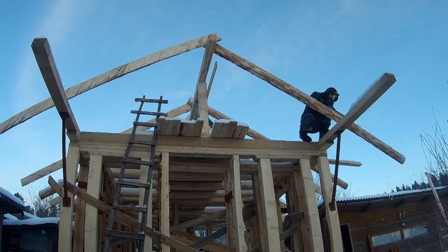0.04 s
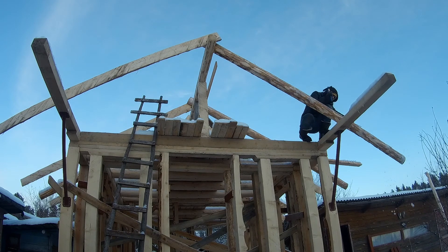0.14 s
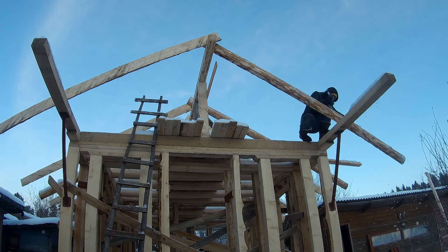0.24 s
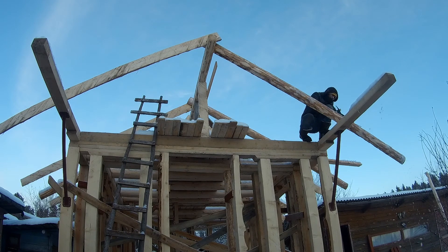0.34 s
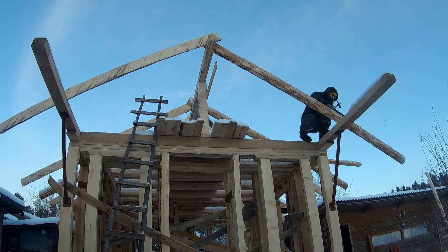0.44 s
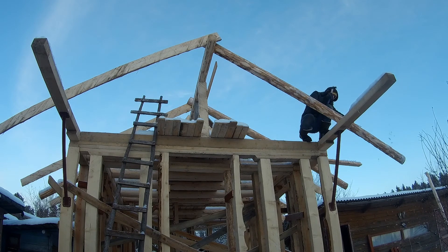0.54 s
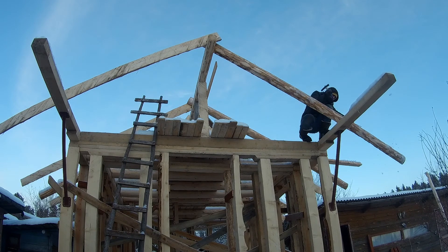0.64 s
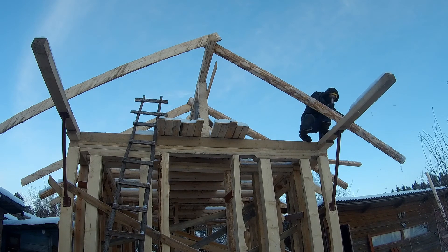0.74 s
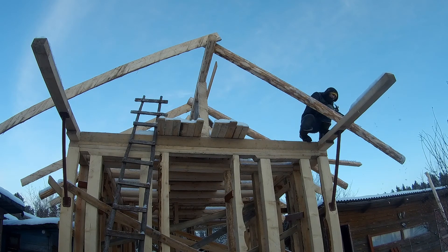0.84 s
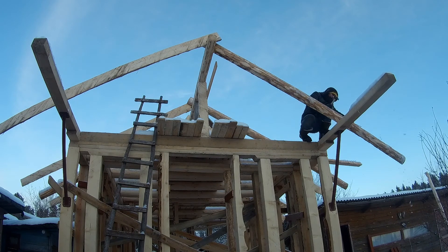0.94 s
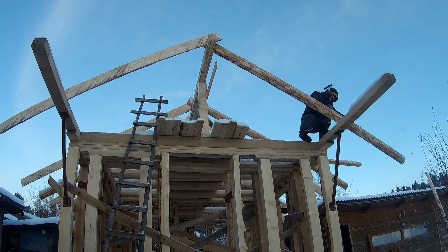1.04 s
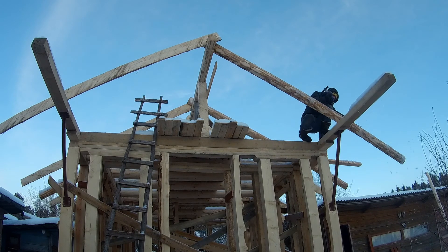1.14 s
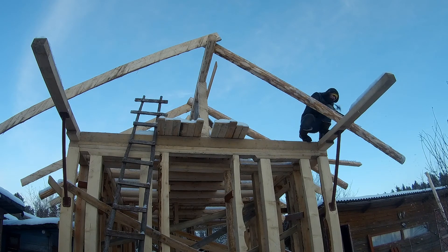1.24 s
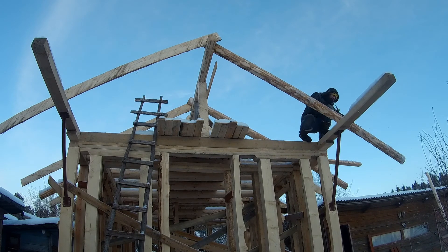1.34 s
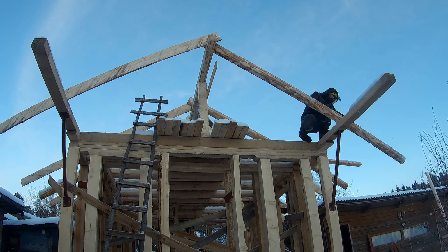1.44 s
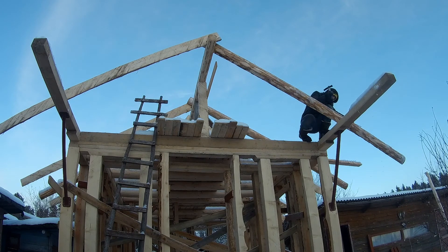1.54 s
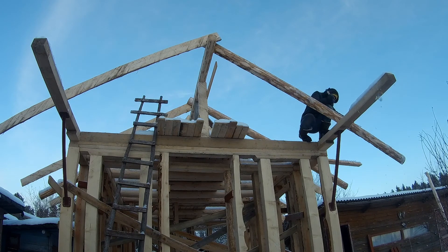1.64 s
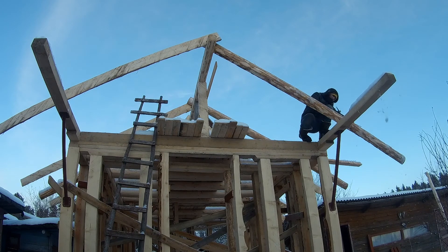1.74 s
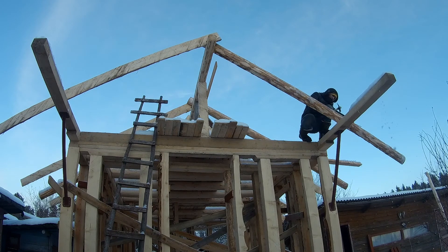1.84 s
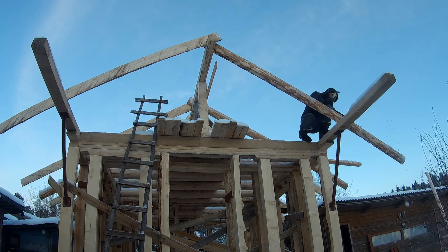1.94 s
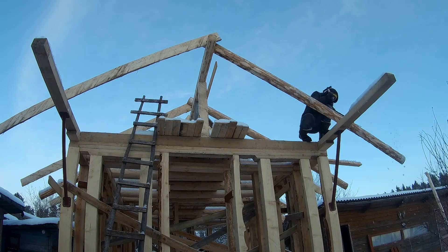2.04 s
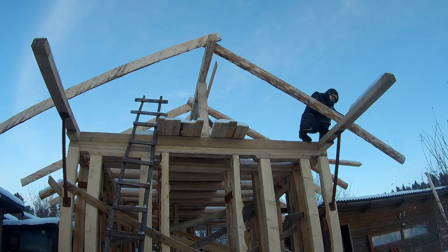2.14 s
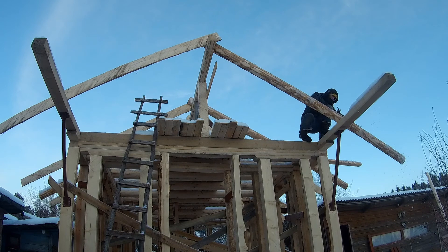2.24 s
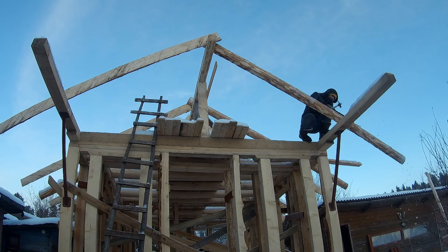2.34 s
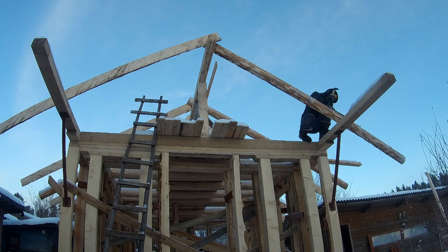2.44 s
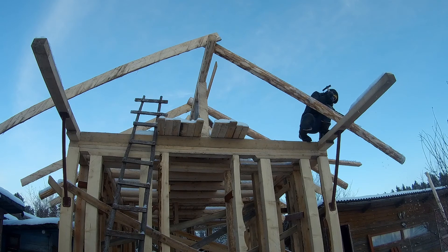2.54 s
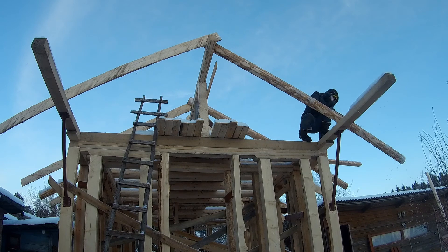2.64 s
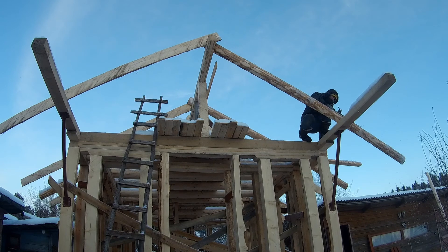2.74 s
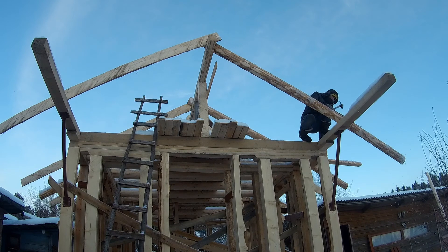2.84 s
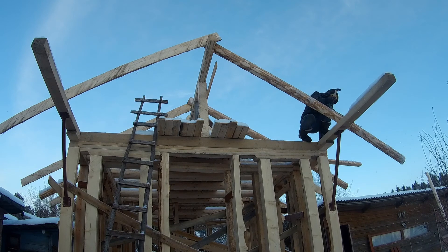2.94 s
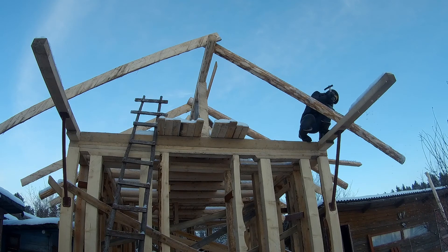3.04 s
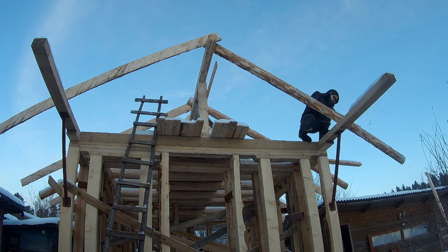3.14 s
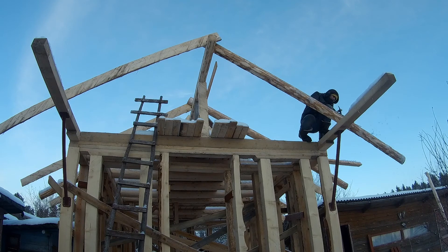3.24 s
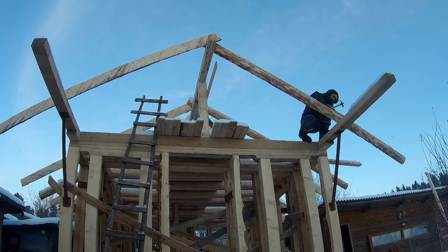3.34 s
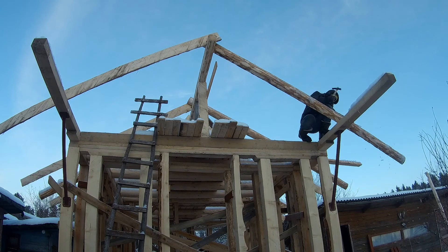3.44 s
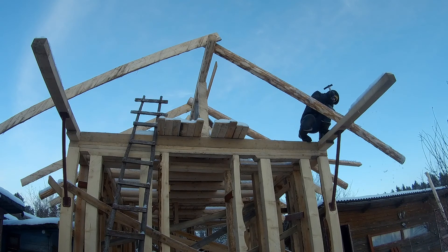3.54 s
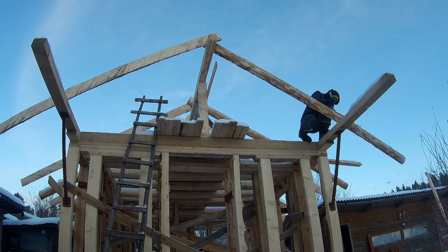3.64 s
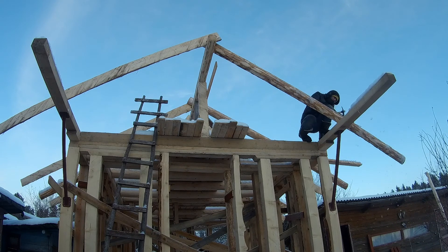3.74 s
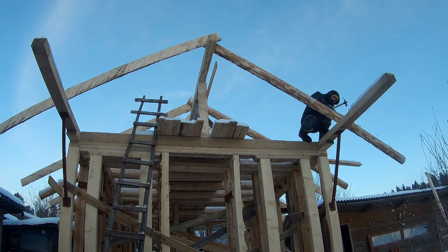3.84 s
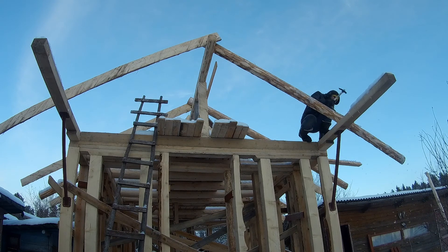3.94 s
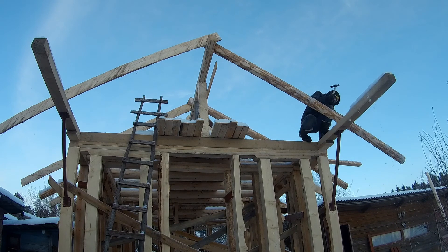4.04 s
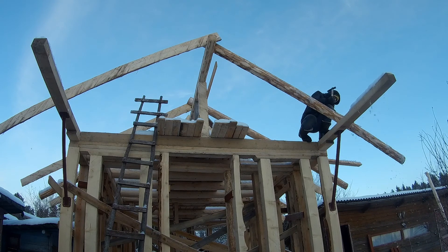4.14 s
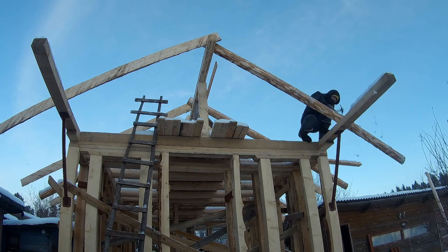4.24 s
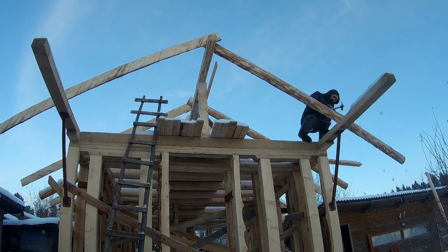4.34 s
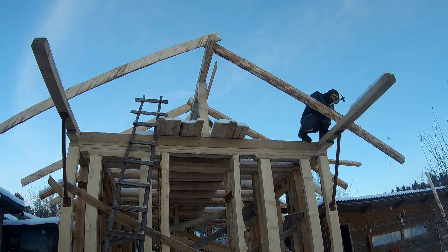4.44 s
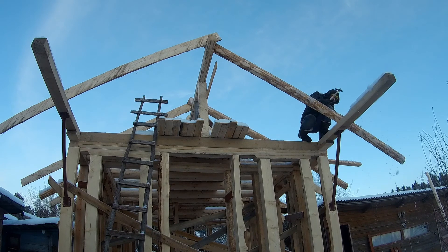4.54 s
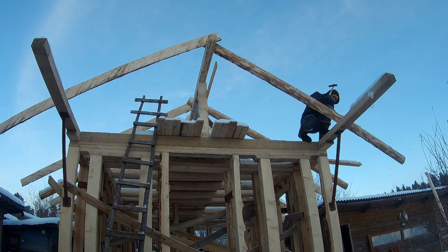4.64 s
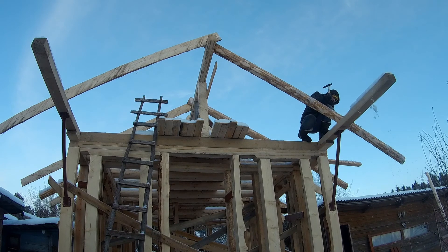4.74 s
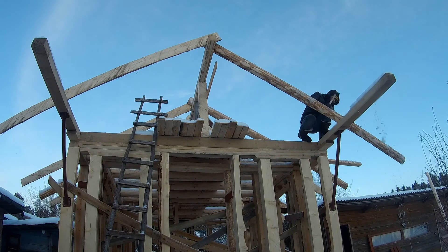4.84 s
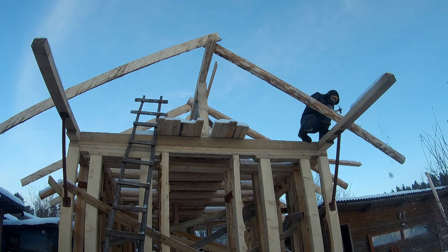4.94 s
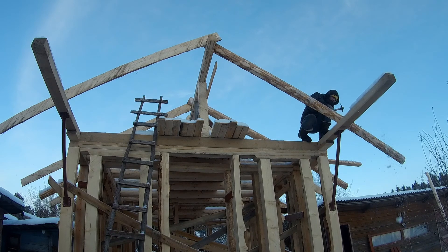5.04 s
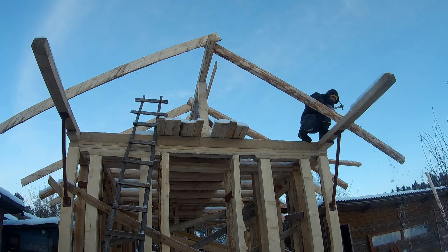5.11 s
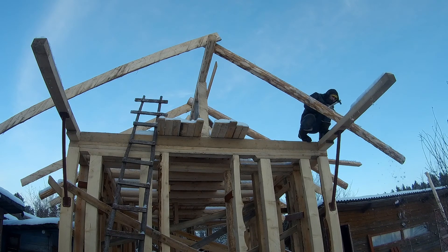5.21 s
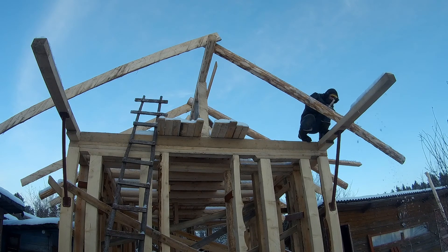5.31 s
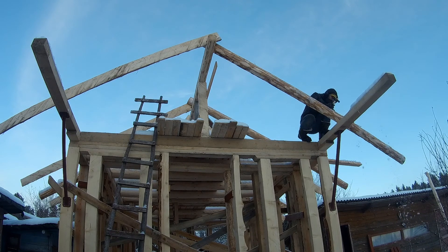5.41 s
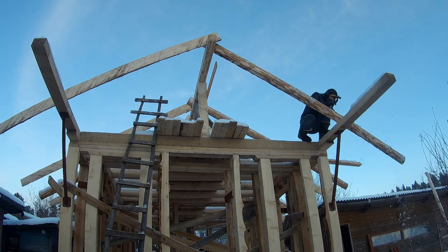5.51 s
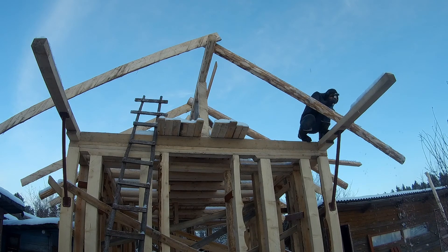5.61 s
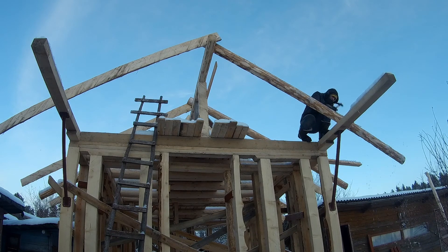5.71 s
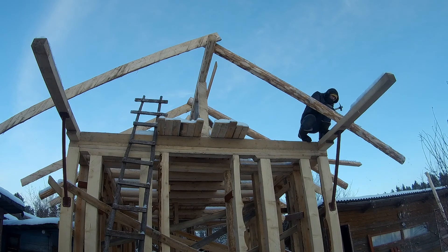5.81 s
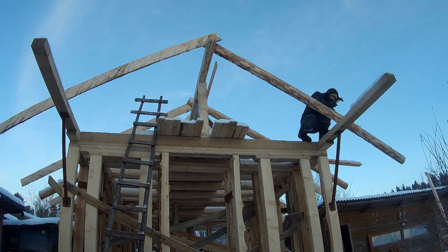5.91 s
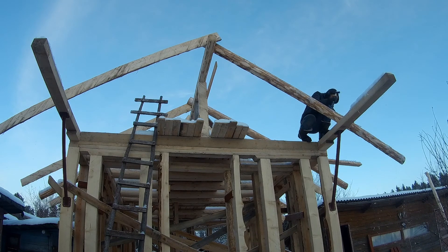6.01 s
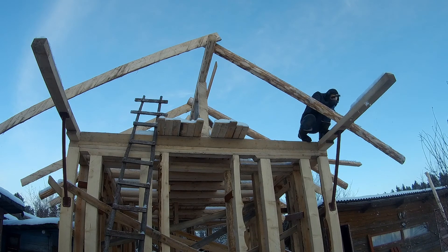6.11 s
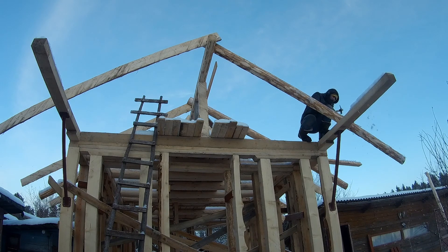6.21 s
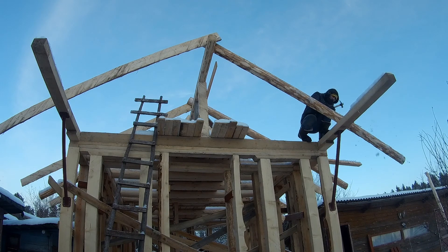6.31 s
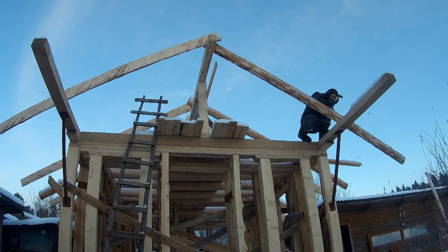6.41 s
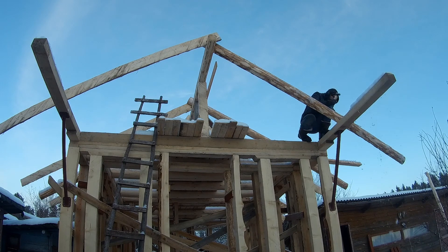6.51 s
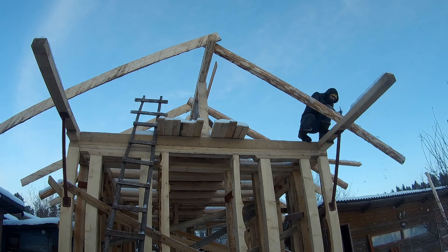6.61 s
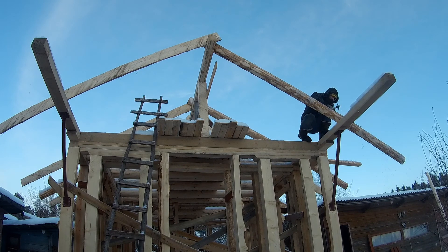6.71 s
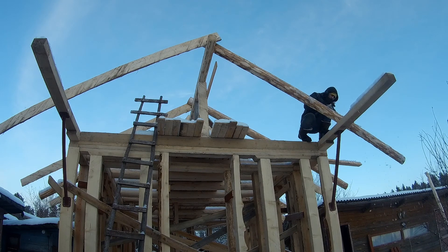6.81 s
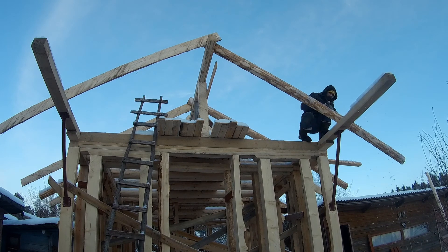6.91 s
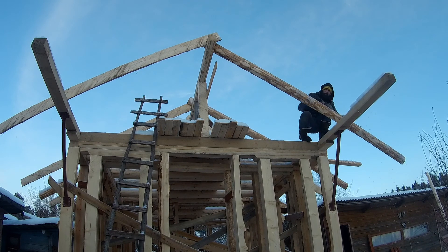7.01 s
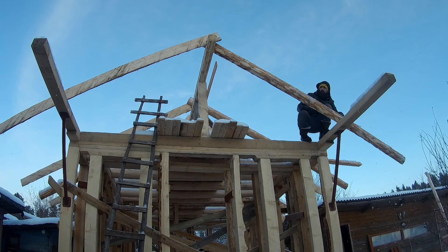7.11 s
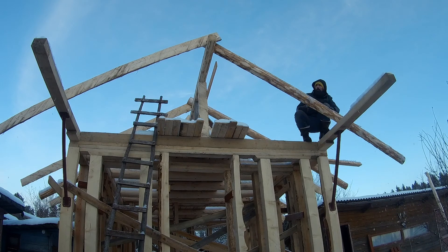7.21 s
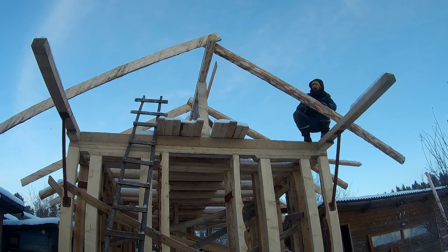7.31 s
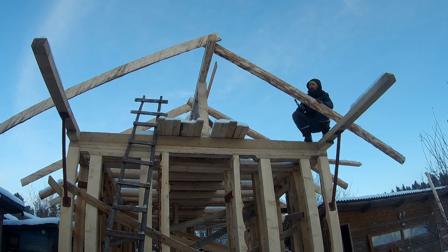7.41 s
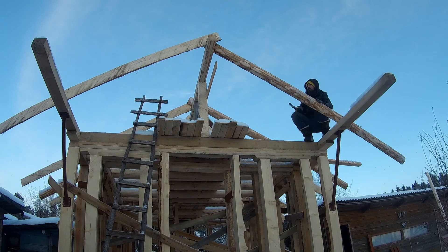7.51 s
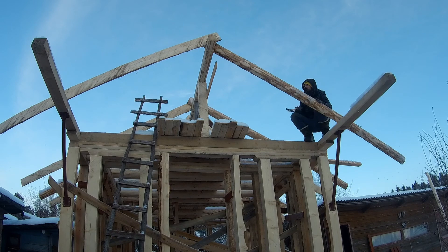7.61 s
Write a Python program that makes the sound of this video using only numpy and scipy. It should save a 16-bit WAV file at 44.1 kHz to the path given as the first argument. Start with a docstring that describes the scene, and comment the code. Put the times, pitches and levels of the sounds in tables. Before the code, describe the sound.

Evenly paced hammer blows on a nail ring through a timber frame outdoors, deepening as it sinks, then cloth rustles faintly.

```python
"""A hammer drives a long nail into a rafter of an open timber frame, heard from the ground on a still winter day.
Over a faint bed of air (shaped noise), the ring of a blow struck before the start is heard first.
Each blow is a steel crack (click), a wooden knock (click), a rafter ring (decaying sines) and a low shudder (noise);
beams, ground and nearby walls send the same echoes back every time. Faint ticks (noise bursts) fall in between.
At the end cloth rustles faintly: grainy noise whose colour shifts."""
import sys
import numpy as np
from scipy import signal
from scipy.fft import rfft, irfft
from scipy.io import wavfile
from scipy.ndimage import uniform_filter1d

SR = 44100
rng = np.random.default_rng(int(sys.argv[2]) if len(sys.argv) > 2 else 0)


def log_audio(samples):
    """Write samples as a 16-bit WAV file to the path given in sys.argv[1]."""
    # one column per channel
    frames = np.atleast_2d(samples).T
    # limit to full scale, then quantise
    limited = np.clip(frames, -1, 1)
    pcm = np.round(limited * 32767).astype(np.int16)
    wavfile.write(sys.argv[1], SR, pcm)


N = 337806
LEAD = SR // 2  # samples made before the start, so that an earlier blow can ring on


def gain_of(db):
    """Decibels to a factor."""
    return 10 ** (np.asarray(db) / 20)


def evened(x):
    """Scales to rms 1."""
    return x / np.sqrt(np.mean(x ** 2) + 1e-20)


def read(points, hz, index=1):
    """Reads one column of a table over log frequency."""
    table = np.transpose(points)
    return np.interp(np.log(hz + 1), np.log(table[0] + 1), table[index])


def coloured(x, points):
    """Passes x through a spectrum."""
    hz = np.fft.rfftfreq(len(x), 1 / SR)
    return irfft(rfft(x) * gain_of(read(points, hz)), len(x))


def add(mix, s, sound):
    """Mixes a sound in at s seconds."""
    part = mix[LEAD + round(s * SR):][:len(sound)]
    part += sound[:len(part)]


def minimum_phase_click(points, size):
    """The click that a sharp impulse makes through a spectrum, nothing before its start."""
    hz = abs(np.fft.fftfreq(size, 1 / SR))
    log_gain = np.log(gain_of(read(points, hz)))
    click = np.fft.ifft(np.exp(np.conj(signal.hilbert(log_gain)))).real
    return click / np.linalg.norm(click) * np.sqrt(SR / 1000)  # its energy is that of 1 ms at level 1


def snap(points, wake_db, t60, size):
    """Two rows: a bare click, and the same click with a short rough wake."""
    t = np.arange(size) / SR
    click = minimum_phase_click(points, size)
    roughness = gain_of(wake_db - 60 * t / t60) * rng.standard_normal(size)
    wake = signal.oaconvolve(roughness, click)[:size]
    return np.array([click, click + wake])


# Noise colour of the still air. Each row: frequency in Hz, relative density in dB per Hz.
AIR_COLOUR = [(12, -30.5), (20, -5), (86, 3), (285, -14), (780, -8), (897, -8), (2670, -20.5), (7110, -28),
              (8650, -26), (13200, -34.5), (16000, -38)]
AIR_DB = -71.5  # rms level


def still_air():
    """Outdoor air: steady noise, strongest in the lows."""
    return gain_of(AIR_DB) * evened(coloured(rng.standard_normal(N), AIR_COLOUR))


# Modes of the rafter. Each row: frequency in Hz, relative level in dB with the nail proud,
# relative level in dB with the nail sunk, decay to -60 dB in seconds.
RAFTER_MODES = [(114, -24.5, -27, 0.9), (177.3, -4.5, -14, 0.27), (232.3, -13, -15, 0.25),
                (253.5, -14.5, -14, 0.18), (335, -11, -17, 0.13), (386.6, -0.5, -9, 0.2),
                (395, -13.5, -6.5, 0.095), (487.4, -9, -2.5, 0.15), (577, -15.5, -2, 0.27),
                (605, -18, -3, 0.096), (687, -14, -5, 0.077), (749.6, -11, -6, 0.22), (791, -11, -2, 0.11),
                (824, -14.5, -3, 0.13), (904, -10, -8, 0.19), (970, -10, -15.5, 0.2),
                (1106, -12.5, -8.5, 0.062), (1203, -7.5, 6.5, 0.066), (1321, -1.5, -9.5, .11),
                (1420, -17.5, -12.5, 0.042), (1474, -15, -13, 0.11), (1565, -19, -5.5, 0.21),
                (1708, -8, -12, 0.16), (1853, -10.5, -21, 0.13), (1971, -3.5, -16, 0.089),
                (2346, -17, -16, 0.077), (2690, -10, -21.5, 0.022)]


def rafter(sunk, build_s):
    """The rafter's modes; the deeper the nail, the more the head meets the wood and the higher modes speak."""
    t = np.arange(SR // 3) / SR
    sunk = np.clip(sunk, 0, 1)
    ring = np.zeros(len(t))
    for hz, proud_db, sunk_db, t60 in RAFTER_MODES:
        mode_db = proud_db + sunk * (sunk_db - proud_db) + 0.5 * rng.standard_normal()
        ring += gain_of(mode_db - 60 * t / t60) * np.sin(2 * np.pi * (hz * t + rng.random()))
    drain = 0.5 + gain_of(-60 * t / 0.1)  # the joints quickly carry much of the motion off into the frame
    build_up = 1 - np.exp(-(t / build_s) ** 2)  # sound arrives from ever farther along the beam
    return ring * drain * build_up


# Dense wood modes, heard as one spectrum. Each row: frequency in Hz, relative level in dB.
KNOCK_COLOUR = [(90, -28), (180, -14), (500, -2), (1200, 0.5), (2000, -7.5), (3000, -17), (4200, -31.5),
                (7000, -47.5)]


def wooden_knock():
    """The wood's many close modes, struck together: a click with a rough wake."""
    return snap(KNOCK_COLOUR, -21.5, 0.032, size=4096)


# Spectrum of steel on steel. Each row: frequency in Hz, relative level in dB.
CRACK_COLOUR = [(800, -23.5), (1500, -4), (2600, -3.5), (3400, -9.5), (4300, -5), (6000, -15.5),
                (8000, -13), (9600, -21.5), (11000, -15), (13000, -27.5), (16000, -35)]


def steel_crack(dull_hz):
    """The crack of head on nail, low-passed at a lower edge in softer contacts."""
    dulling = signal.butter(2, np.clip(dull_hz, 500, 20000), fs=SR)
    return signal.lfilter(*dulling, snap(CRACK_COLOUR, -14.5, 0.014, size=2048))


# Spectrum of the whole frame moving. Each row: frequency in Hz, relative level in dB.
SHUDDER_COLOUR = [(20, -16), (30, -7), (55, 2), (80, 3.5), (110, -4), (150, -13), (250, -46.5)]


def frame_shudder(rise_s, t60, size):
    """The frame shaken as a whole: low noise that swells over rise_s and dies away."""
    t = np.arange(size) / SR
    rumble = evened(coloured(rng.standard_normal(size), SHUDDER_COLOUR))
    return rumble * (1 - np.exp(-t / rise_s)) * gain_of(-60 * t / t60)


# Single echoes off beams, ground and walls.
# Each row: delay in seconds, level of the crack's echo in dB, level of the knock's echo in dB.
ECHOES = [(.0033, 2.5, 2), (.0085, -5.5, 5), (0.0134, -15, -4), (.021, -23, -9.5), (.038, -19.5, -23),
          (0.06, -21, -48.5), (.142, -35.5, -33), (.153, -40, -26.5), (0.197, -44, -49), (.212, -58, -33),
          (.272, -66, -71)]


def echo_taps(column):
    """Direct sound and single echoes; rough faces smear the far ones."""
    taps = np.zeros(SR // 2)
    taps[0] = 1
    for echo in ECHOES:
        smear = min(max(echo[0] - 0.015, 0) * 6000, 260)  # samples, growing past 15 ms of delay
        face = np.hanning(3 + round(smear))[1:-1]
        face = face * rng.choice([-1.0, 1.0], len(face))
        taps[round(echo[0] * SR):][:len(face)] += gain_of(echo[column]) * face / np.linalg.norm(face)
    return taps


# Scattered sound. Each row: frequency in Hz, level among the beams in dB, its decay to -60 dB in seconds,
# level in the yard in dB, its decay to -60 dB in seconds, level from far trees in dB.
SCATTER = [(100, -5, 0.47, -24.5, 0.72, -45), (298, 0, 0.27, -18.5, 0.37, -51),
           (915, -0.5, 0.087, -14, 0.4, -35.5), (2020, -2, 0.12, -14.5, 0.41, -39),
           (3200, 2, 0.081, -22.5, 0.42, -53), (4700, -1.5, 0.053, -22, 0.28, -58),
           (10000, 0, 0.091, -27, 0.58, -66.5), (15000, -6.5, 0.046, -34, .2, -71)]
FAR_DELAY_S, FAR_SPREAD_S, FAR_DB = 0.585, 0.03, -52  # a late, soft answer from far off


def scattered():
    """Sound scattered among the beams, in the yard and from far trees: noise decaying band by band."""
    hz, t, z = signal.stft(rng.standard_normal(SR), SR, nperseg=128)
    near_db, near_t60, yard_db, yard_t60, far_db = (read(SCATTER, hz, index=k)[:, None] for k in range(1, 6))
    wall = 1 + 0.66 * (t > 0.138)  # a distant wall lifts the yard's answer as its echo arrives
    level = gain_of(near_db - 60 * t / near_t60)
    level += wall * gain_of(yard_db - 60 * t / yard_t60)
    level += gain_of(far_db - 60 * t / 1.6)
    late = np.exp(-((t - FAR_DELAY_S) / FAR_SPREAD_S) ** 2)
    late_colour = np.exp(-np.log((hz[:, None] + 1) / 1100) ** 2)
    level += gain_of(FAR_DB) * late * late_colour
    onset = 1 - np.exp(-np.arange(SR) / SR / 0.0031)
    return signal.istft(z * level, SR, nperseg=128)[1][:SR] * onset


# The hammer blows. Each row: time of the crack in seconds, gain of the rafter's modes in dB,
# level of the steel crack in dB over 1 ms, how far the nail is sunk from 0 to 1, build-up of the wood in seconds.
BLOWS = [(-.130, -20, -19.5, 0.52, 0.0014), (0.3366, -21.5, -18, 0, 0.0023),
         (0.7949, -19.5, -17.5, 0, 0.0032), (1.2644, -17, -17, .17, 0.0046),
         (1.7451, -18.5, -17.5, 0.16, .0023), (2.2197, -16, -17, 0.29, .004),
         (2.7200, -12, -17.5, 0.46, 0.0032), (3.2183, -10.5, -18.5, 0.76, 0.0035),
         (3.7385, -9.5, -17.5, 0.74, .0045), (4.2550, -9, -16, 0.79, .0067),
         (4.9310, -9.5, -25, 0.72, 0.0085), (5.7414, -10.5, -27.5, 0.85, 0.0027),
         (6.1811, -11.5, -16, 1, 0.0038), (6.6227, -9.5, -29, 0.78, 0.003)]
# a crack below full level is duller: dB of edge frequency per dB lost
FULL_CRACK_DB, CRISP_HZ, DULLING = -19.5, 11900, 0.87
# knock over ring, gain as the nail sinks, share of the crack's loss
KNOCK_DB, KNOCK_SUNK_DB, KNOCK_SHARE = -6.5, 9.0, 0.67
# the longer the wood takes to build up, the heavier the thud
SHUDDER_DB, THUD_DB, THUD_DB_PER_S = -47.5, -65, 3999


def hammering():
    """All blows; the rafter starts just before the crack, as sound runs faster along the beam than through air."""
    cracks, knocks, beam, low, spread = np.zeros((5, N + LEAD))
    for s, ring_db, crack_db, sunk, build_s in BLOWS:
        loss_db = min(crack_db - FULL_CRACK_DB, 0)
        knock_db = ring_db + KNOCK_DB + KNOCK_SUNK_DB * sunk ** 2 + KNOCK_SHARE * loss_db
        bare_knock, knock = gain_of(knock_db) * wooden_knock()
        bare_crack, crack = gain_of(crack_db) * steel_crack(CRISP_HZ * gain_of(DULLING * loss_db))
        add(beam, s - 0.002, gain_of(ring_db) * rafter(sunk, build_s))
        add(knocks, s - 0.0035 + 0.8 * build_s, knock)
        add(cracks, s, crack)
        # the bare clicks feed the scattered tail, keeping its colour even
        add(spread, s, gain_of(-19) * bare_knock)
        add(spread, s, gain_of(-22) * bare_crack)
        add(low, s, gain_of(SHUDDER_DB) * frame_shudder(0.01, 1.2, size=SR))
        thud_db = THUD_DB + THUD_DB_PER_S * build_s
        add(low, s, gain_of(thud_db) * frame_shudder(0.004, 0.18, size=SR // 4))
    # crack and knock get single echoes; the rafter's ring has its early echoes within its mode levels
    echoed = signal.fftconvolve(cracks, echo_taps(column=1))
    echoed += signal.fftconvolve(knocks, echo_taps(column=2))
    # a little of the rafter's ring joins the clicks in the scattered tail
    diffuse = signal.fftconvolve(spread + gain_of(-35) * beam, scattered())
    return (beam + low + echoed[:N + LEAD] + diffuse[:N + LEAD])[LEAD:]


# Faint ticks. Each row: start in seconds, level in dB before the band filter.
TICKS = [(4.6794, -60), (4.8996, -59), (5.2636, -54), (5.273, -56), (5.599, -65), (7.5074, -61.5)]


def ticks():
    """Faint dry ticks: band-passed noise that dies within milliseconds."""
    out = np.zeros(N + LEAD)
    t = np.arange(600) / SR
    band = signal.butter(1, (1900, 9100), "bandpass", fs=SR)  # Hz
    for s, db in TICKS:
        add(out, s, gain_of(db - 60 * t / 0.017) * signal.lfilter(*band, rng.standard_normal(600)))
    return out[LEAD:]


# Noise colour of rubbing cloth. Each row: frequency in Hz, relative density in dB per Hz.
CLOTH_COLOUR = [(88, -40), (150, -11.5), (515, -0.5), (972, -5), (1730, 0), (3470, -12.5), (5720, -12.5),
                (6810, -23.5), (7790, -16.5), (15000, -36)]
# faded in by the first time, peaks, fades out from the last; the fade-in takes twice the edge
RUSTLE_S, RUSTLE_TOP_S, RUSTLE_END_S, RUSTLE_EDGE_S = 7.08, 7.32, 7.6, 0.061
RUSTLE_DB, RUSTLE_SAG_DB, RUSTLE_PATCHY_DB = -58.5, -3, 2.5  # at the peak, lower towards both ends, uneven


def rustle():
    """Cloth: hiss with small uneven grains, its colour shifting as folds rub."""
    t = np.arange(N) / SR
    times = [RUSTLE_S, RUSTLE_TOP_S, RUSTLE_END_S]
    arch_db = RUSTLE_DB + np.interp(t, times, [RUSTLE_SAG_DB, 0, RUSTLE_SAG_DB])
    nearest_edge = np.minimum((t - RUSTLE_S) / 2, RUSTLE_END_S - t)
    edges = np.clip(nearest_edge / RUSTLE_EDGE_S + 1, 0, 1) ** 2
    sparks = gain_of(3 * rng.exponential(1, N)) * (rng.random(N) < 200 / SR)  # about 200 per second
    grains = 1 + 0.25 * uniform_filter1d(sparks, size=100) * 100  # each lasts 100 samples
    z = signal.stft(coloured(rng.standard_normal(N) * grains, CLOTH_COLOUR), nperseg=256)[2]
    folds = uniform_filter1d(rng.standard_normal(z.shape), size=8, axis=0)
    folds = evened(uniform_filter1d(folds, size=12, axis=1))
    hiss = signal.istft(z * gain_of(RUSTLE_PATCHY_DB * folds), nperseg=256)[1][:N]
    return evened(hiss) * gain_of(arch_db) * edges


def scene():
    """The still air, the blows and the small sounds."""
    return (still_air() + hammering() + ticks() + rustle())[None]


EDGE_HZ = 16300  # upper band limit


def record(dry):
    """An input that clips peaks beyond full scale; then the band limit."""
    clipped = np.clip(dry, -1, 1)
    low_pass = signal.firwin(255, EDGE_HZ, window=("kaiser", 9), fs=SR)
    return signal.oaconvolve(clipped, low_pass[None], "same")


dry = scene()
out = record(dry)
log_audio(out)
```